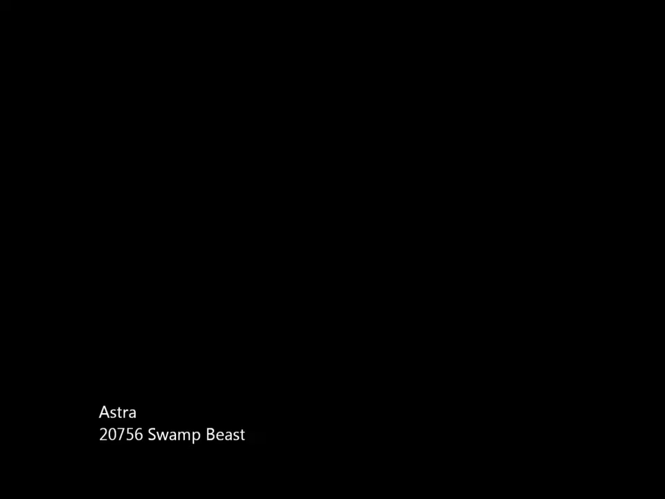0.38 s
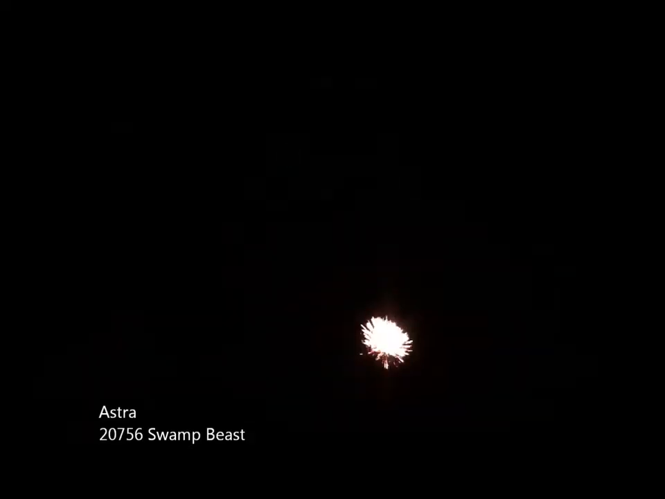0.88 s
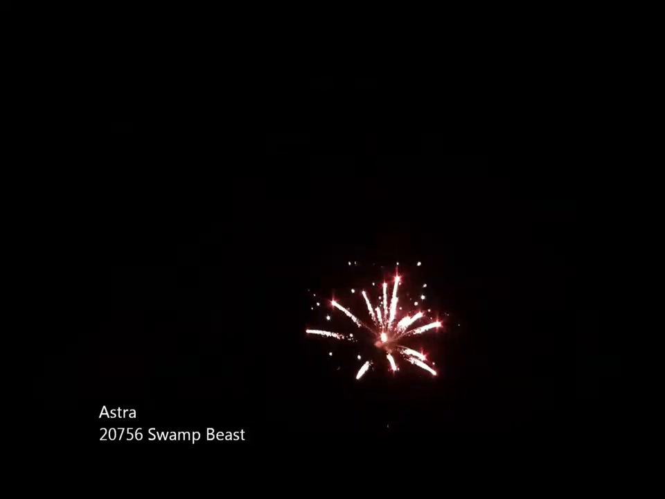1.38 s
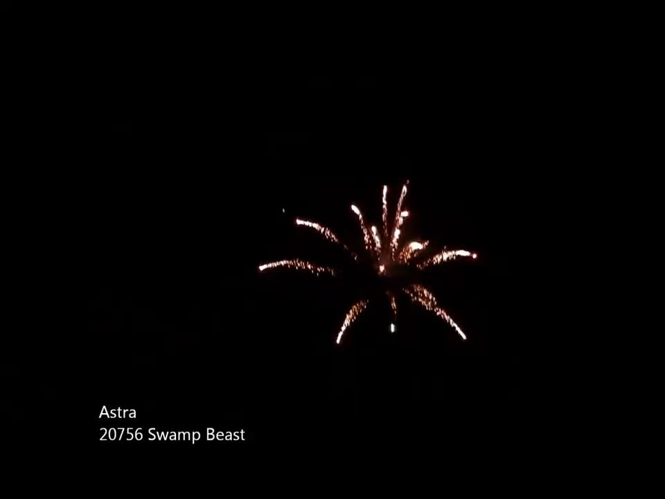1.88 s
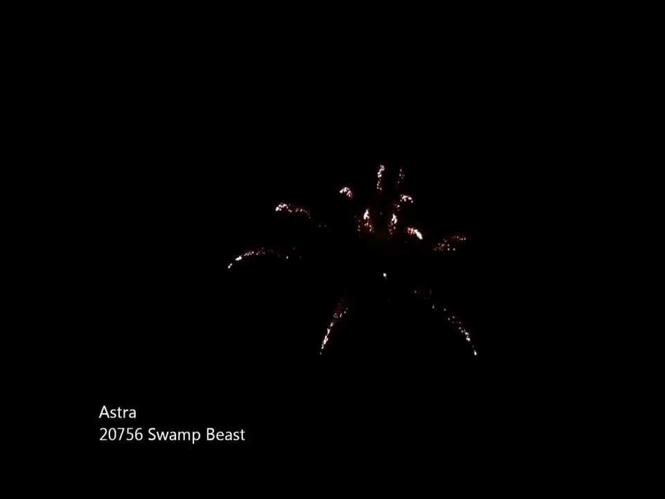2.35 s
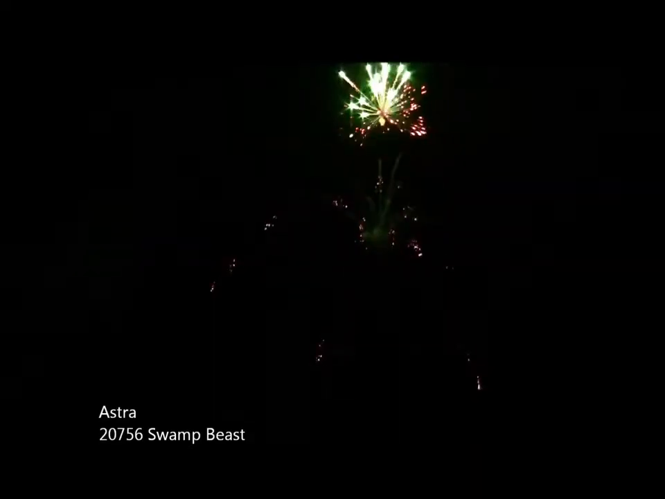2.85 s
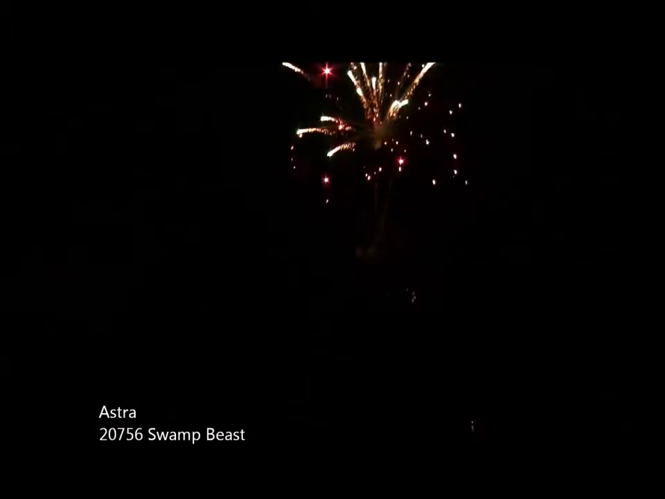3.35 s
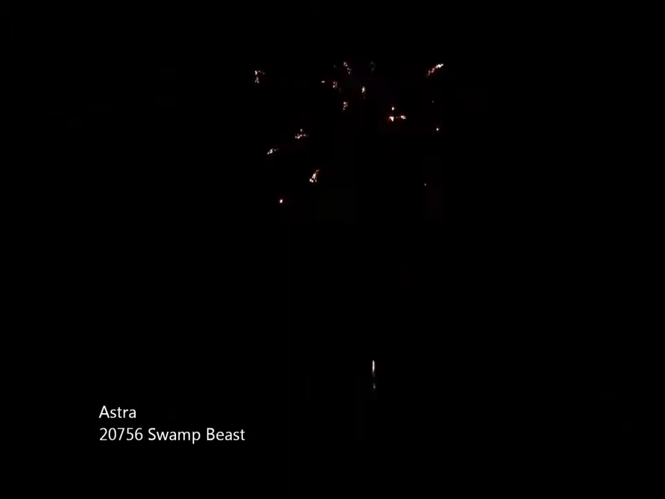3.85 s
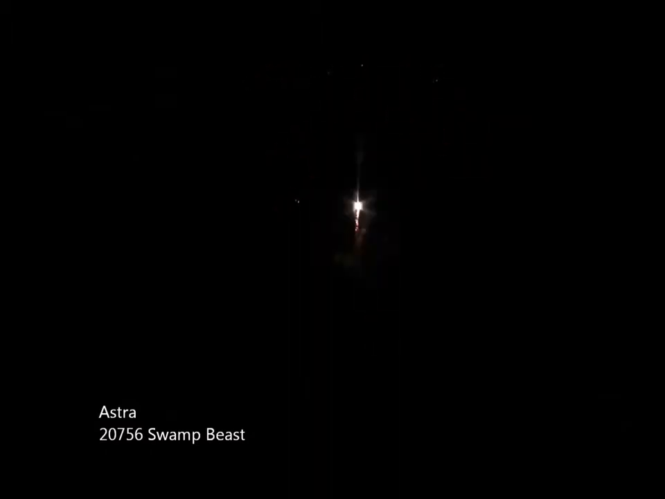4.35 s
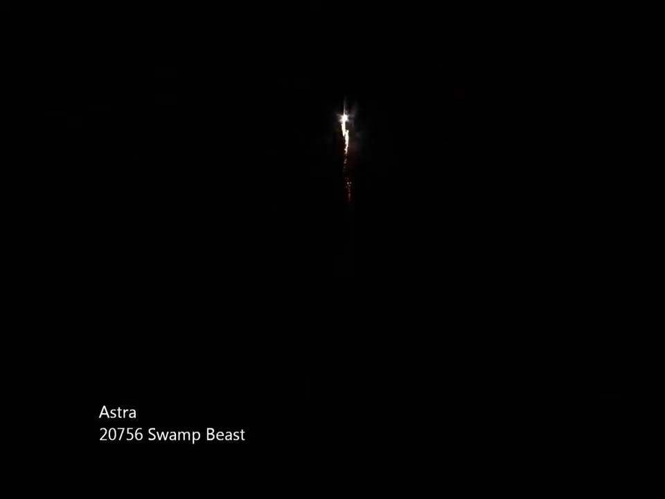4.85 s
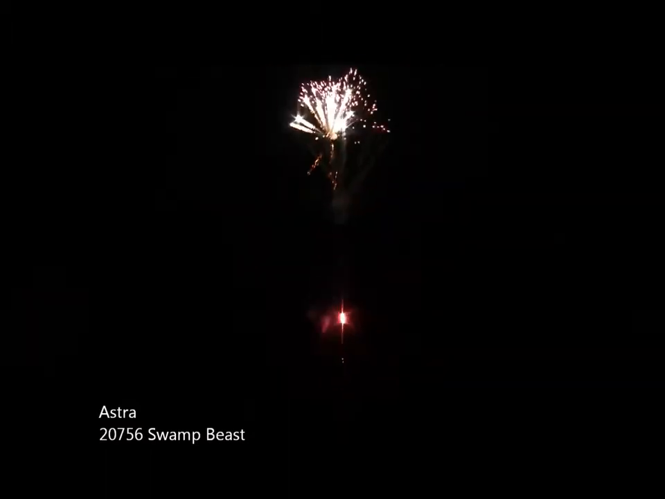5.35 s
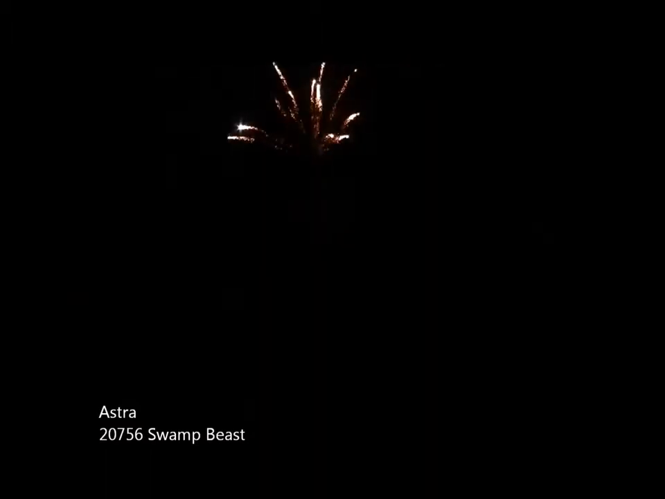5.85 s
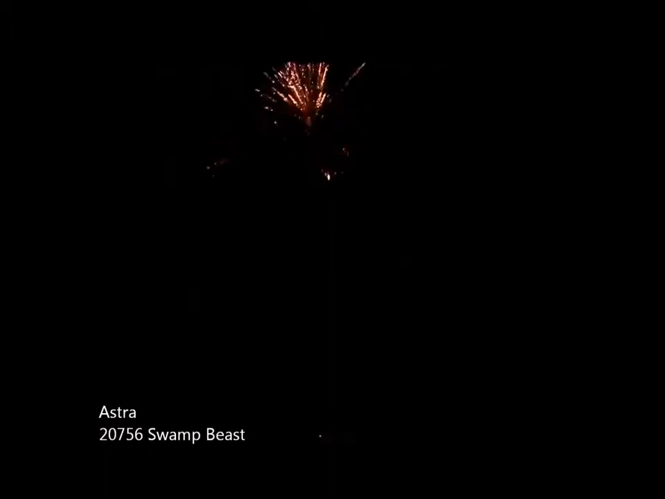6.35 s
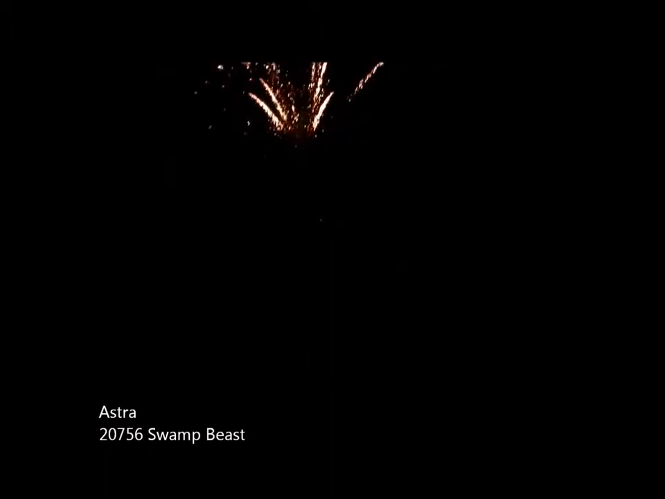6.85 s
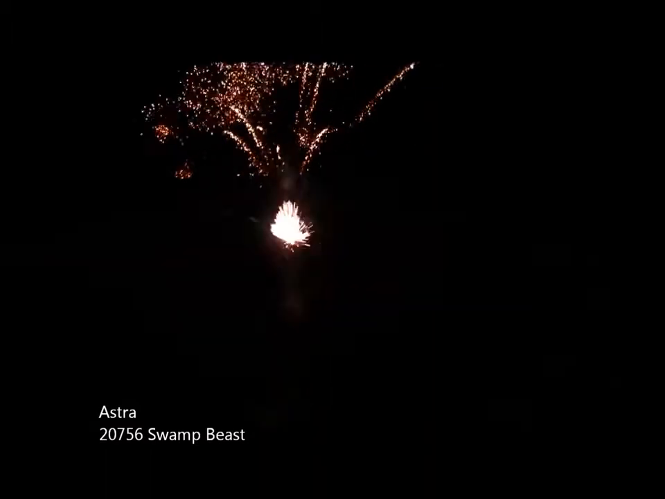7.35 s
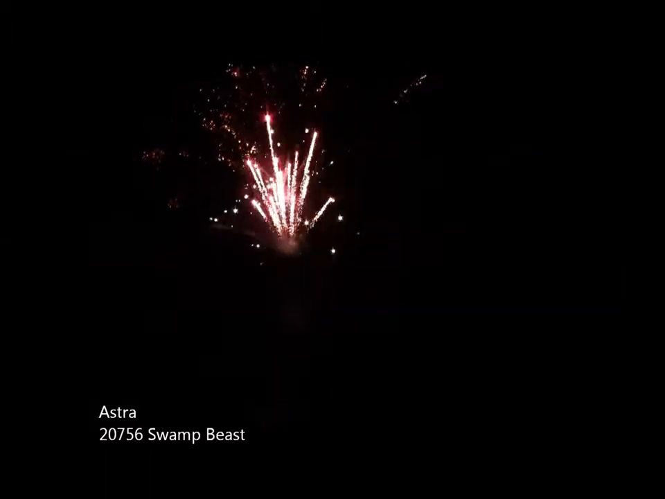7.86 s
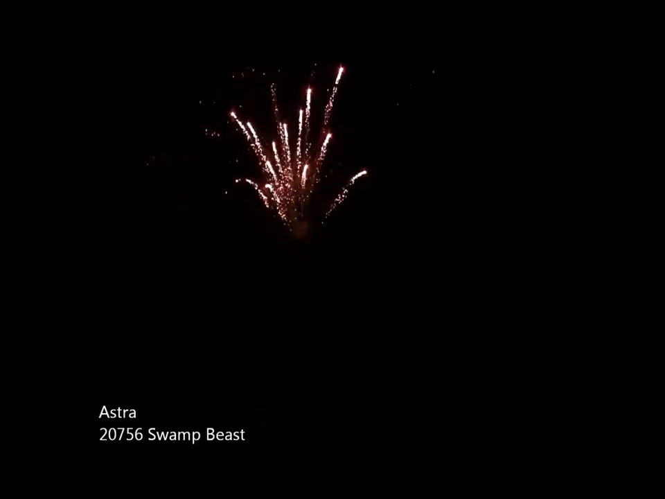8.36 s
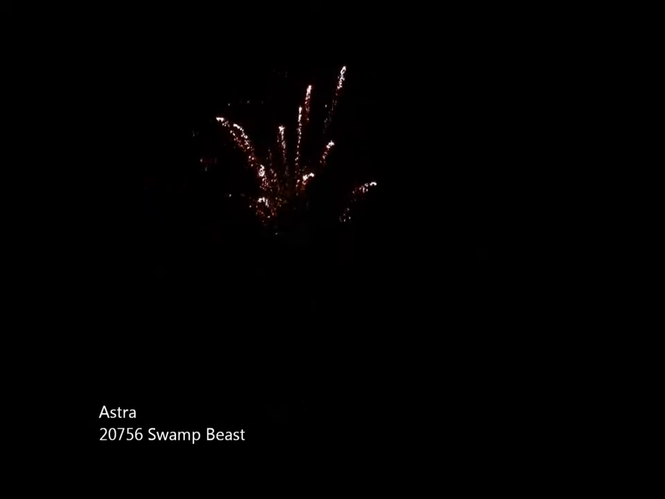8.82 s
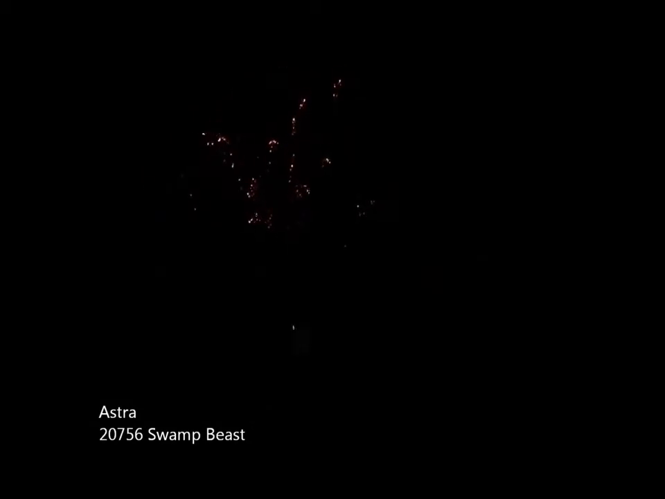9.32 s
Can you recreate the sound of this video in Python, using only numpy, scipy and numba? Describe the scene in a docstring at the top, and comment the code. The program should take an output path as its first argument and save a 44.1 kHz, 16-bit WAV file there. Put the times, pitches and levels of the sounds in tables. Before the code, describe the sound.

Complete silence lasts about 0.55 s, then thin high insect hiss, small falling cricket chirps and low night rumble enter, with a few soft echo thuds around 0.9 s. A violent, clipped bang hits at 1.2 s, followed by a weaker launch thump at 1.8 s and lumpy echoes knocking until about 2.5 s. Another big burst lands at 3.0 s, a launch at 3.9 s, and dull echoes roll away. A launch at 5.25 s is quickly followed by a large bang at 5.5 s. Dry, dense crackling runs from 5.9 to 6.35 s; a small launch at 6.4 s and burst at 6.5 s follow. Crackling returns from 7.2 to 7.6 s, then a strong bang at 7.7 s and a last weaker thump at 8.6 s. Echoes fade into insects after 9 s. The small stereo microphone overloads, ducks and slowly recovers throughout.

```python
"""Fireworks bang and crackle at night over open ground, rolling back from afar above insects and low rumble.
Blasts are pressure pulses with near bounces; stars are tiny blasts, single and in dense swarms.
Echoes are shaped noise and soft wave packets; insects are throbbing noise bands and falling sine chirps.
A small stereo microphone overloads on the bangs, and its gain control ducks and slowly recovers."""
import sys
import numpy as np
from scipy import signal
from scipy.fft import rfft, irfft
from scipy.io import wavfile
from scipy.ndimage import uniform_filter1d
from numba import njit

SR = 44100
rng = np.random.default_rng(int(sys.argv[2]) if len(sys.argv) > 2 else 0)


def log_audio(samples):
    """Write samples as a 16-bit WAV file to the path given in sys.argv[1]."""
    # one column per channel
    frames = np.atleast_2d(samples).T
    # limit to full scale, then quantise
    limited = np.clip(frames, -1, 1)
    pcm = np.round(limited * 32767).astype(np.int16)
    wavfile.write(sys.argv[1], SR, pcm)


def linear_from_db(decibels):
    """Turn decibels (scalar or array-like) into linear amplitude factors; 0 gives 1."""
    return 10 ** (np.asarray(decibels, float) / 20)


N = 417186
T = np.arange(N) / SR  # seconds
SIDES = np.array([[1], [-1]])  # left, right
START_S = 0.548  # silence before this

# All levels are relative, ahead of the gain control.
# Insect choruses. Each row: centre in Hz, filter width in Hz, level in dB, random level changes per second,
# depth of those changes in dB.
INSECTS = [(8453, 1380, -41, 250, 1), (8480, 1950, -46, 420, 3.5), (4550, 900, -45, 60, 2)]
# Swell and hush of the choruses. Each row: time in seconds, level change in dB.
CHORUS_SWELL = [(.5, -1), (1.6, -3), (3, -0.6), (3.8, 1.5), (4.6, -2.2), (4.78, 2.5), (5.3, 0.5),
                (5.7, -1.5), (6.9, -6.5), (7.7, -3.5), (8, -11), (8.4, -2.5), (9.46, 2)]
# Cricket chirps. Each row: centre of the first pulse in seconds, number of pulses, starting pitch in Hz.
CHIRPS = [(.55, 2, 4700), (.633, 6, 4950), (1.02, 2, 4700), (2.163, 4, 4700), (2.353, 3, 4700),
          (2.578, 3, 4700), (2.77, 5, 4950), (2.804, 3, 4700), (3.773, 3, 4700), (4.015, 3, 4700),
          (4.21, 2, 4700), (4.335, 6, 4950), (4.55, 6, 4950), (4.695, 3, 4700), (4.865, 3, 4700),
          (5.04, 3, 4700), (5.21, 2, 4700), (5.40, 3, 4700), (7.109, 3, 4700), (7.324, 1, 4700),
          (8.193, 3, 4700), (8.42, 3, 4700), (8.67, 2, 4700), (8.777, 3, 4950), (8.86, 3, 4700),
          (9.032, 3, 4700), (9.25, 4, 4700)]
# Loudness of each cricket. Starting pitch in Hz gives level in dB.
CHIRP_DB = {4700: -40, 4950: -42}
# Pace of each cricket. Starting pitch in Hz gives pulse spacing in seconds.
PULSE_SPACING_S = {4700: .038, 4950: .034}
CHIRP_FALL_HZ, CHIRP_PULSE_S = 438, 0.022

# Colour of the night rumble and air. Each row: frequency in Hz, relative density in dB per Hz.
NIGHT_COLOUR = [(18, -52), (30, -22), (148, -0.5), (410, -3), (1000, -13), (2360, -21.5), (3500, -16),
                (6000, -21.5), (10000, -20), (15500, -45.5)]
NIGHT_DB = -39.5
# Stereo likeness of the wide noises. Each row: frequency in Hz, likeness of left and right from 0 to 1.
LIKENESS = [(60, 0.82), (130, 1), (290, 0.91), (640, 0.75), (1410, 0), (3100, 0.06), (6820, 0.05),
            (15000, 0)]
# Stereo tilt of the wide noises. Each row: frequency in Hz, left minus right in dB.
TILT = [(60, 5), (110, -3), (200, -1.0), (380, -1.5), (700, -1.5), (1290, -0.5), (2380, -1), (4400, 2),
        (8120, 0), (15000, -25)]

# Echoes off single big surfaces. Each row: centre of the first arrival in seconds, level in dB, pitch in Hz,
# delay of the second arrival in ms, rattle level in dB.
THUDS = [(0.8976, -10, 270, 5.3, -61), (0.9186, -15.5, 291, 9, -56), (1.054, -28, 500, 6, -43),
         (1.4722, -9.5, 470, 5, -21.5), (1.5555, -14, 560, 6, -45), (1.6309, -9.5, 708, 6, -45),
         (1.7086, -9.5, 410, 4.4, -47), (1.7442, -7, 463, 17.5, -43), (1.765, -11.5, 515, 5.9, -45),
         (2.0019, -16, 560, 4.4, -30), (2.1263, -6, 530, 6.8, -41), (2.2767, -10, 570, 5, -26.5),
         (2.3217, -22, 610, 5, -33.5), (2.5243, -11, 387, 5.5, -30.5), (2.87, -27.5, 500, 4.8, -36.5),
         (3.3192, -7.5, 565, 5, -72), (3.3872, -10.5, 581, 6, -49), (3.463, -12.5, 356, 6.1, -73),
         (3.5131, -15, 483, 6.4, -43), (3.6131, -11, 348, 6.3, -45), (3.7461, -16, 497, 6, -29),
         (3.876, -7.5, 470, 5.9, -41), (4.0201, -14.5, 520, 18, -27), (4.1174, -14.5, 500, 6, -39),
         (4.2764, -7.5, 515, 6.8, -35), (7.0299, -18, 420, 16, -53), (7.9602, -16, 614, 6, -43),
         (8.136, -14.5, 550, 13.4, -36), (8.2383, -16.5, 470, 15.5, -45), (8.339, -15, 417, 11, -45),
         (8.4816, -13, 560, 10, -39), (8.7549, -14.5, 460, 6, -29.5), (9.0034, -11, 474, 7.8, -36.5),
         (9.0183, -11.5, 420, 6.9, -45)]
SECOND_DB, RATTLE_MS = -0.5, 10.6
SCATTER_DB, SCATTER_S = -14, 0.019  # dull blur trailing each thud
# Lesser surfaces: pitches in Hz.
LUMP_HZ = (420, 520, 624, 795)
LUMPS_PER_S, LUMP_DB, LUMP_SPREAD_DB = 70, -0.3, 3.5  # levels against the roll

# Lift charges and shell bursts. Each row: start in seconds, blast level in dB, push length in ms,
# ground bounce delay in ms, echo treble trim in dB at full brightness.
BANGS = [(1.2337, 23.5, 0.32, 4.06, 3), (1.8131, 10.5, 0.37, 4.55, -16), (3.0103, 23, 0.38, 4.54, 3.5),
         (3.9024, 10.5, 0.35, 4.5, 0), (5.2523, 11.5, 0.35, 4.5, 9), (5.5009, 22, 0.46, 4.24, 2),
         (6.3907, 6.5, 0.38, 4.6, 10), (6.5248, 17.5, 0.59, 3.96, 1.3), (7.715, 20, 0.42, 4.1, 2.1),
         (8.5838, 9, 0.4, 4.5, 4.5)]
# Arrival of far echoes after one bang; air eats the late treble. Each row: delay in seconds, level in dB,
# treble trim in dB at full brightness.
ROLL = [(0, 8, -16), (.1, -2.5, -8), (.22, -8, -7), (.3, -2, -10), (.45, -3, -8.5), (.6, -2.5, -13.5),
        (.8, -6.5, -10), (1.1, -13.5, -9), (1.6, -23, -26), (2.5, -58, -26)]
# Colour of the dull roll. Each row: frequency in Hz, relative density in dB per Hz.
ROLL_COLOUR = [(24, -64.5), (40, -25.5), (200, -1.5), (383, -2), (535, 1), (909, -10), (1040, -14),
               (1500, -12.5), (1950, -27.5), (3300, -120)]
# Colour of the treble wash. Each row: frequency in Hz, relative density in dB per Hz.
ROLL_TREBLE = [(530, -59), (900, -5), (1180, -10), (1340, -8.5), (7060, -19.5), (8230, -30), (13300, -46.5),
               (15000, -68)]
FAR_LOSS_DB = -43  # far echoes against their blast
LIFT_UNDER_DB, HEDGE_DB = 14, -3  # weaker blasts are lifts at ground level, whose echoes are shaded

# Loudest crackling stars. Each row: start in seconds, relative level in dB.
SNAPS = [(5.8944, -2), (5.9097, -4), (5.9157, -10), (5.9287, 1), (5.942, -10), (5.9532, -2), (5.982, -3),
         (6.0026, 2), (6.033, 9), (6.069, 5), (6.082, 2), (6.161, -3), (6.1843, -4), (6.2019, -7),
         (6.341, -10), (6.368, 1.5), (7.2039, -8), (7.2854, -0.5), (7.356, -3), (7.4015, 2.5), (7.4173, -8),
         (7.4376, -9), (7.4401, -3.5), (7.4626, -2.5), (7.473, -8), (7.494, -9), (7.4977, -9), (7.505, -6),
         (7.5078, -9), (7.519, -8), (7.5225, -3.5), (7.549, -15), (7.5572, -5), (7.5643, -3)]
# Swarms of crackling stars, one list per swarm. Each row: time in seconds, relative level in dB.
SWARMS = [
    [(5.893, -29), (5.95, -19.5), (6.0, -16), (6.06, -11.5), (6.13, -17), (6.15, -22.5), (6.3, -37.5)],
    [(7.4, -33), (7.44, -33), (7.525, -30.5), (7.54, -42), (7.565, -30.5), (7.62, -48)],
]
STARS_DB, STARS_LEFT_DB, STARS_SPREAD_DB = 4.5, 2.5, 5  # all stars, left minus right, random placing
POPS_PER_S, POP_SPREAD_DB = 1100, 14

# Ringing of the microphone housing. Each row: centre in Hz, width in Hz, level in dB.
HOUSING = [(470, 113, 3.5), (186, 47, -3)]
LOW_CUT_HZ, TOP_HZ = 132, 9700
HISS_DB = -46  # amplifier noise, after the gain control


def band(x, hz, width):
    """Two-pole band-pass, gain 1 at the centre."""
    return signal.lfilter(*signal.iirpeak(hz, hz / width, fs=SR), x)


def unit(x):
    """Scale to rms 1."""
    return x / np.sqrt(np.mean(x ** 2))


def along_hz(table):
    """Spread a (Hz, value) table over the frequencies of an N-point transform."""
    hz, value = np.transpose(table)
    return np.interp(np.log(np.arange(N // 2 + 1) * SR / N + 1), np.log(hz), value)


def over_time(table):
    """Follow a (seconds, dB) table, inaudible outside it."""
    return np.interp(T, *np.transpose(table), left=-200, right=-200)


def wide(mid, side, colour):
    """Colour two unrelated signals and blend them so that the bass is alike left and right."""
    like = np.clip(along_hz(LIKENESS), 0, 1)
    pair = rfft(mid) * np.sqrt(1 + like) + SIDES * rfft(side) * np.sqrt(1 - like)
    colour_db = along_hz(colour) + SIDES * along_hz(TILT) / 2
    return unit(irfft(pair * linear_from_db(colour_db), N))


def walk(rate):
    """Random levels held 1 / rate seconds and smoothed, with spread 1."""
    k = int(SR / rate)
    steps = np.repeat(rng.standard_normal(N // k + 1), k)
    return unit(uniform_filter1d(steps, k)[:N])


def add(out, s, x):
    """Mix x into out from s seconds."""
    i = int(s * SR)
    out[:, i:i + x.shape[1]] += x[:, :N - i]


def choruses():
    """Bands of noise stand for many wings, their levels throbbing at random."""
    out = np.zeros((2, N))
    swell_db = np.interp(T, *np.transpose(CHORUS_SWELL))
    for hz, width, db, throb, depth_db in INSECTS:
        mid, side = band(band(rng.standard_normal((2, N)), hz, width), hz, width)
        level_db = db + depth_db * walk(throb) + 0.96 * walk(9.1) + swell_db
        out += linear_from_db(level_db) * unit(mid + 0.61 * SIDES * side)
    return out


def crickets():
    """Each chirp is a run of rounded sine pulses that fall in pitch, roughened by uneven teeth."""
    out = np.zeros((2, N))
    t = T[:int(CHIRP_PULSE_S * SR)]
    for s, pulses, hz in CHIRPS:
        cycles = hz * t - CHIRP_FALL_HZ * t ** 2 / (2 * CHIRP_PULSE_S)
        pulse = np.sin(np.pi * t / CHIRP_PULSE_S) * np.sin(2 * np.pi * cycles)
        rasp = 1 + 4.1 * uniform_filter1d(rng.standard_normal((2, 7 * len(t))), size=40)
        for k in range(round(pulses)):
            level_db = CHIRP_DB[hz] - 5.5 * (k == 0) + 5.2 * SIDES  # softer first stroke, louder left
            teeth = rasp[:, k * len(t):][:, :len(t)]
            add(out, s + k * PULSE_SPACING_S[hz] - CHIRP_PULSE_S / 2, linear_from_db(level_db) * pulse * teeth)
    return out


def night():
    """Distant rumble and air: wide coloured noise, swaying a little."""
    return linear_from_db(NIGHT_DB + 0.84 * walk(8)) * wide(*rng.standard_normal((2, N)), NIGHT_COLOUR)


def far(bright):
    """Sum the power of all bangs' far echoes and give its level, in the bass (0) to the treble (1)."""
    lag, shape_db, treble_db = np.transpose(ROLL)
    power = 0
    for s, db, _, _, own_treble_db in BANGS:
        arrival_db = np.interp(T - s, lag, shape_db + bright * treble_db, left=-200, right=-200)
        shade_db = HEDGE_DB * (db < LIFT_UNDER_DB)
        power = power + linear_from_db(db + FAR_LOSS_DB + shade_db + bright * own_treble_db + arrival_db) ** 2
    return np.sqrt(power)


def packet(hz):
    """A bang off one surface: a few soft cycles, first on the right, centred about 16 ms in."""
    t = T[:1400] - 0.016 + SIDES * -0.0001
    envelope = np.exp(-(t * hz / np.where(t < 0, 0.55, 0.9)) ** 2)
    return linear_from_db(SIDES * -0.7) * np.cos(2 * np.pi * hz * t) * envelope


def thuds():
    """Big surfaces answer twice, straight and by the ground, with a blur and a rattle from hard edges."""
    out = np.zeros((2, N))
    rattle_shape = np.exp(-((T[:2600] - 0.03) * 1000 / RATTLE_MS) ** 2)
    blur_shape = np.exp(-T[:3000] / SCATTER_S) * (1 - np.exp(-T[:3000] / 0.0045))
    for s, db, hz, second_ms, rattle_db in THUDS:
        add(out, s - 0.016, linear_from_db(db) * packet(hz))
        add(out, s - 0.016 + second_ms / 1000, linear_from_db(db + SECOND_DB) * packet(hz))
        blur = band(band(rng.standard_normal(3000), hz, 360), hz, 360)
        add(out, s - 0.004, linear_from_db(db + SCATTER_DB) * unit(blur[None]) * blur_shape)
        rattle = band(band(rng.standard_normal((2, 2600)), 1080, 1200), 1080, 1200)
        add(out, s - 0.026, linear_from_db(rattle_db) * rattle_shape * unit(rattle))
    return out


def lumps():
    """Lesser surfaces answer at random moments, as loud as the far echoes allow."""
    out = np.zeros((2, N))
    level = far(0)
    for hz in LUMP_HZ:
        struck = rng.random(N) < LUMPS_PER_S / len(LUMP_HZ) / SR
        hits = struck * linear_from_db(LUMP_DB + LUMP_SPREAD_DB * rng.standard_normal(N))
        out += signal.oaconvolve((level * hits)[None], packet(hz), axes=1)[:, :N]
    return out


def blast(push_ms, late_ms, fade):
    """Shock front, falling push, then suction; the microphone is wired so that pressure reads negative."""
    u = (T[:600] * 1000 - late_ms) / push_ms
    return (u >= 0) * (u - 1) * np.exp(-fade * np.abs(u))


def heard(push_ms, bounce_ms, bounce_db, wall_ms, wall_db, fade):
    """A blast, its bounce off the ground (later and softer on the right) and off a near wall to the left."""
    left = linear_from_db(bounce_db) * blast(0.65 * push_ms, bounce_ms, fade)
    left = left + linear_from_db(wall_db) * blast(0.087 * push_ms, wall_ms, fade)
    right = linear_from_db(bounce_db - 1) * blast(0.74 * push_ms, bounce_ms + 0.25, fade)
    right = right + linear_from_db(wall_db - 11) * blast(0.89 * push_ms, wall_ms + 0.13, fade)
    return blast(push_ms, 0, fade) + np.array([left, right])


def bangs():
    """Every charge is a blast with a short, fading noise spray of near reflections."""
    out = np.zeros((2, N))
    for s, db, push_ms, bounce_ms, _ in BANGS:
        add(out, s, linear_from_db(db) * heard(push_ms, bounce_ms, -6.0, 8.7, -16.5, 0.54))
        spray = rng.standard_normal((2, 4000)) * np.exp(-T[:4000] / 0.0064)
        body = band(spray[:1] + 1.5 * spray, 640, 720)  # partly shared by both sides
        add(out, s, linear_from_db(db - 26) * spray + linear_from_db(db - 12) * body)
    return out


def roll():
    """Countless small reflectors return each bang: uneven dull grains under a smooth wash of treble."""
    sparks = (rng.random(N) < 1200 / SR) * linear_from_db(8.0 * rng.random(N))
    grains = rng.standard_normal((2, N)) * (0.36 + sparks)
    dull = linear_from_db(2.05 * walk(14)) * wide(*grains, ROLL_COLOUR)
    wash = linear_from_db(1.3 * walk(60)) * wide(*rng.standard_normal((2, N)), ROLL_TREBLE)
    return far(0) * dull + far(0.86) * wash


def crackle():
    """Each star pops as a tiny blast with a fizz of scattered reflections; swarms are dense, clumped pops."""
    star = heard(0.12, 3.7, 0.25, 6.7, -2, 1.29)
    fizz = band(rng.standard_normal(star.shape), 1440, 3100) * np.exp(-T[:star.shape[1]] / 0.013)
    star = star + linear_from_db(-17.5) * fizz
    snaps = np.zeros((2, N))
    for (s, db), place in zip(SNAPS, rng.standard_normal(len(SNAPS))):
        add(snaps, s, linear_from_db(db + SIDES * STARS_SPREAD_DB * place / 2) * star)
    level = sum(linear_from_db(over_time(swarm)) for swarm in SWARMS)
    pop_db = POP_SPREAD_DB * rng.random((2, N)) + 2.9 * walk(90)
    mid, side = (rng.random((2, N)) < POPS_PER_S / SR) * linear_from_db(pop_db)
    pops = level * unit(mid + 0.6 * SIDES * side)
    swarms = signal.fftconvolve(pops, star, axes=1)[:, :N]
    return (snaps + swarms) * linear_from_db(STARS_DB + SIDES * STARS_LEFT_DB / 2)


def through_housing(direct):
    """Blasts ring the housing and add a low thump, while the microphone sheds deep bass and top treble."""
    direct = direct + sum(linear_from_db(db) * band(direct, hz, width) for hz, width, db in HOUSING)
    thump = linear_from_db(-5.5) * band(band(direct, 136, 100), 73, 330)  # a low thump under each blast
    low_cut = signal.butter(4, LOW_CUT_HZ, "high", fs=SR, output="sos")
    direct = thump + signal.sosfilt(low_cut, direct)
    return signal.sosfilt(signal.butter(3, TOP_HZ, fs=SR, output="sos"), direct)


def scene():
    """Lay insects, night air and echoes around the direct blasts and stars."""
    around = choruses() + crickets() + night() + thuds() + lumps() + roll()
    return (around + through_housing(bangs() + crackle())) * (T > START_S)


@njit
def follow(x, attack_s, hold_s, release_s):
    """Peak follower that rises fast, holds, then sinks."""
    e, wait, out = 1e-9, 0., np.empty(len(x))
    for i in range(len(x)):
        if x[i] > e:
            e, wait = e + (x[i] - e) / (attack_s * SR), hold_s * SR
        elif wait > 0:
            wait -= 1
        else:
            e += (x[i] - e) / (release_s * SR)
        out[i] = e
    return out


def band_limit(x):
    """A steep low-pass at the top of the band."""
    return signal.sosfilt(signal.butter(12, 16930, fs=SR, output="sos"), x)


def record(dry):
    """Gain control in two stages, a quick duck under bangs and a slow rider, too late to stop the overload."""
    size = np.abs(dry).max(axis=0)
    duck = np.maximum(follow(size, 0.0018, 0.087, 0.12) / linear_from_db(-6.5), 1) ** -0.75
    ride = np.maximum(follow(size * duck, 0.006, 0.016, 1.74) / linear_from_db(-25.5), 1) ** -0.6
    hiss = linear_from_db(HISS_DB) * band(rng.standard_normal(dry.shape), 5300, 6400) * (T > START_S)
    overloaded = np.clip(dry * duck * ride * linear_from_db(11.5) + hiss, -1, 1)
    return band_limit(overloaded)


dry = scene()
out = record(dry)
log_audio(out)
```